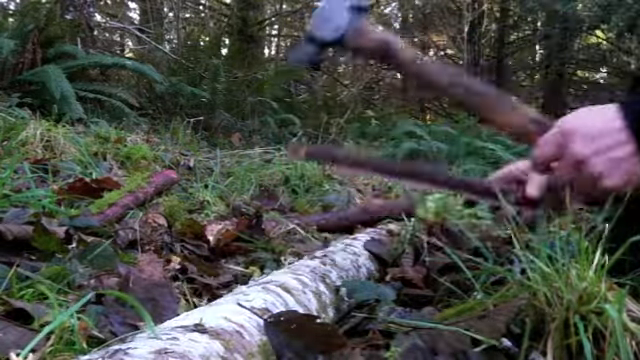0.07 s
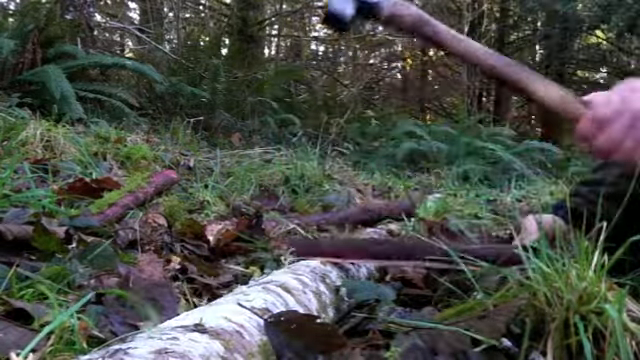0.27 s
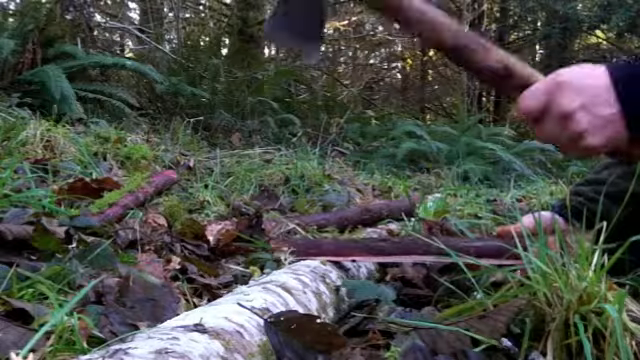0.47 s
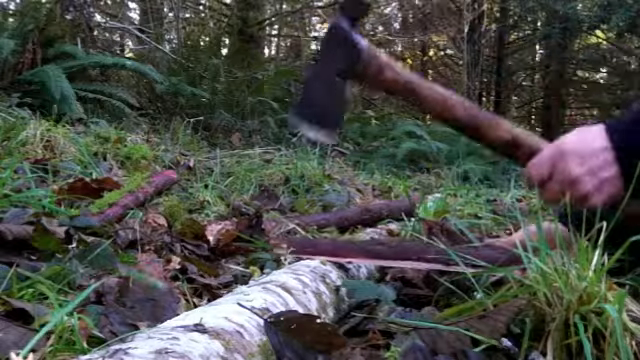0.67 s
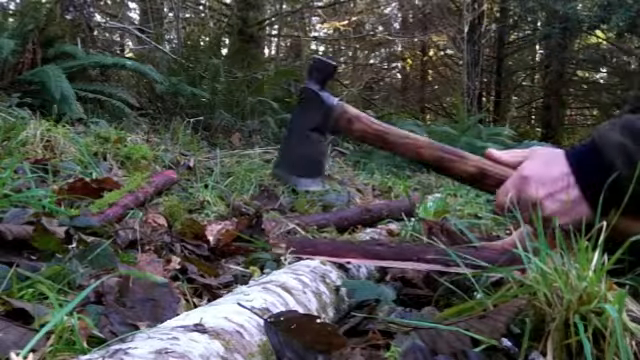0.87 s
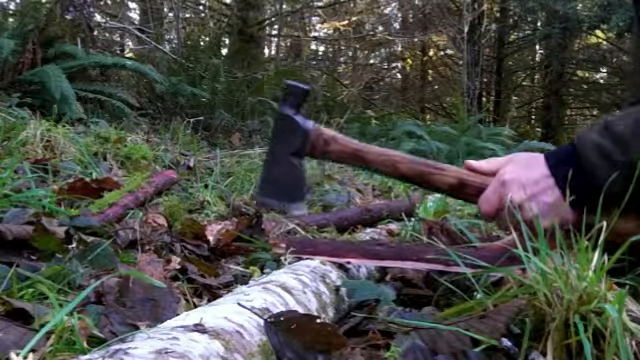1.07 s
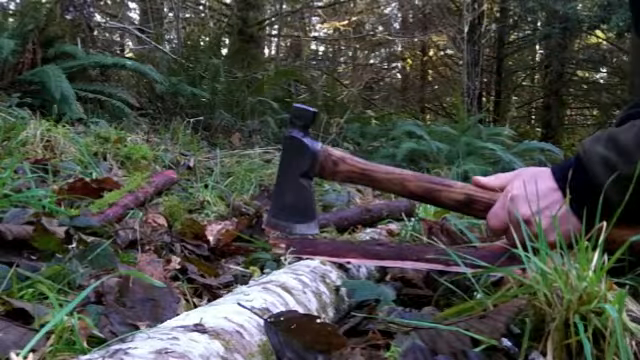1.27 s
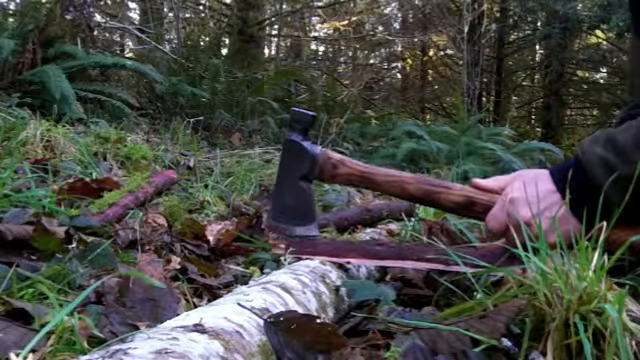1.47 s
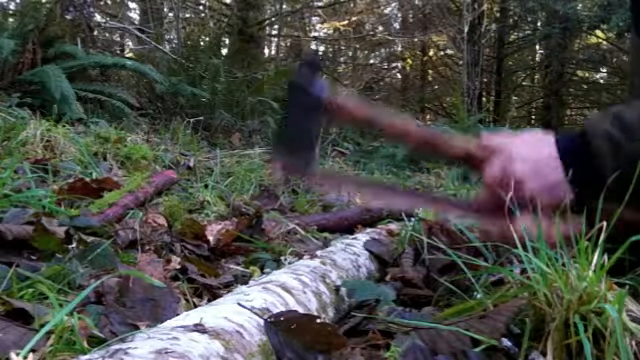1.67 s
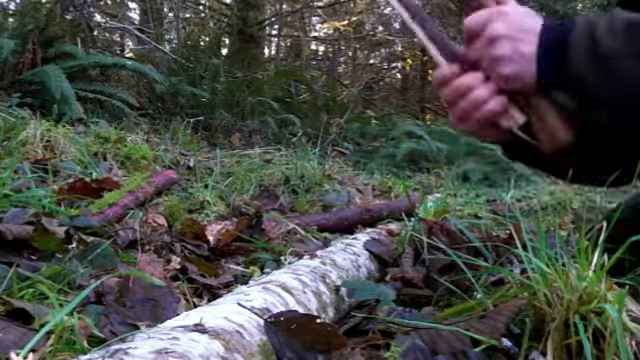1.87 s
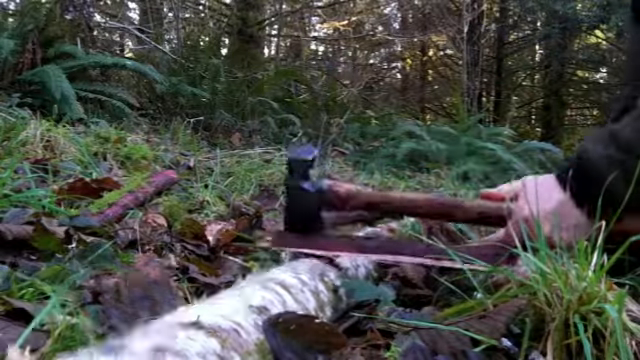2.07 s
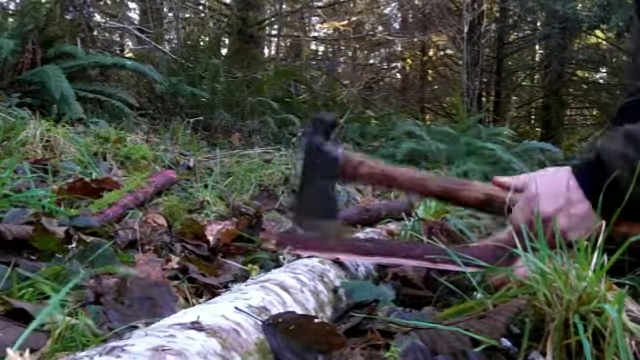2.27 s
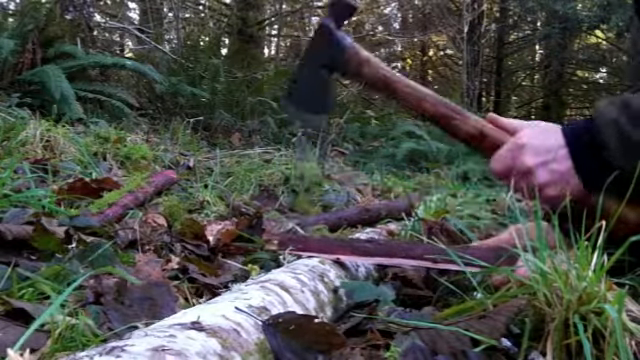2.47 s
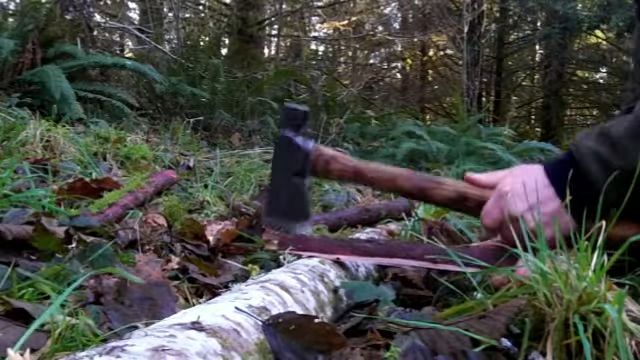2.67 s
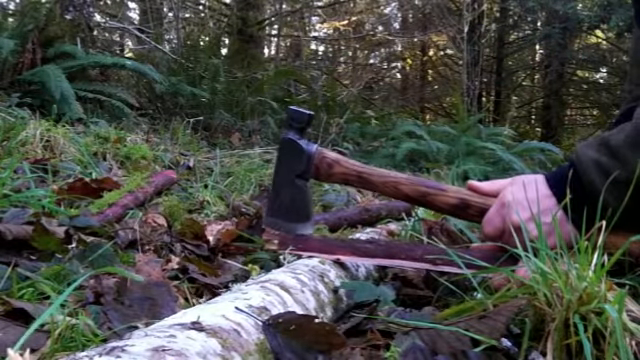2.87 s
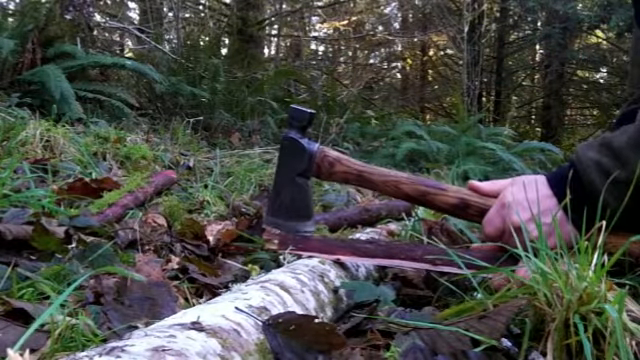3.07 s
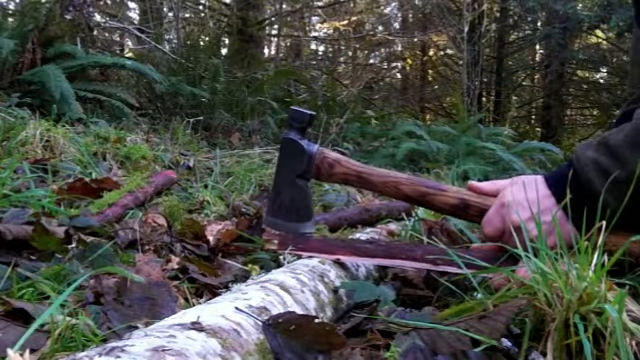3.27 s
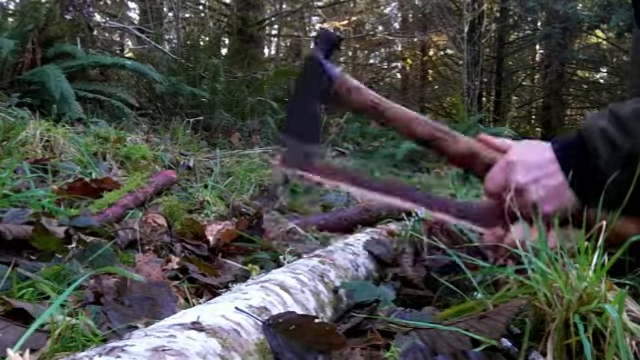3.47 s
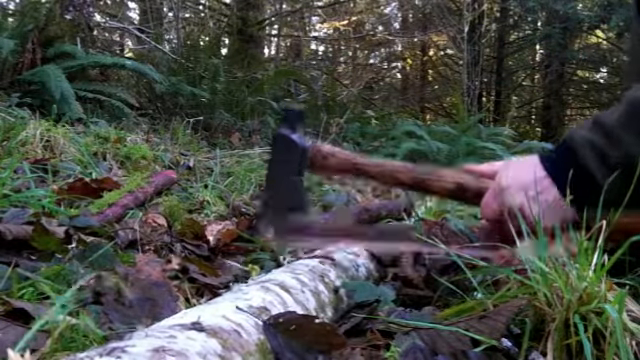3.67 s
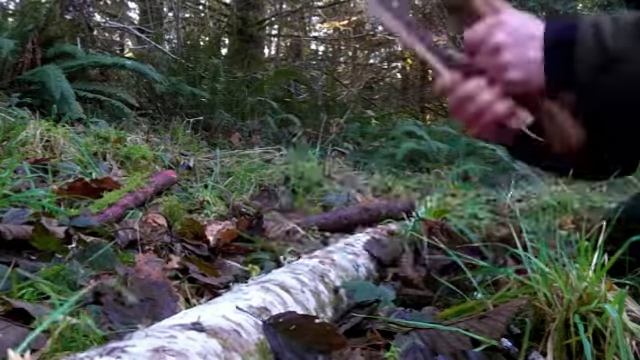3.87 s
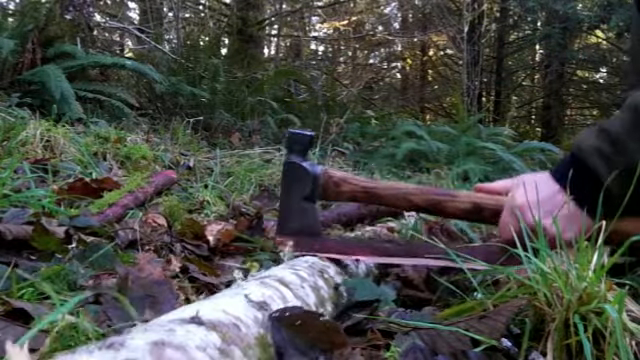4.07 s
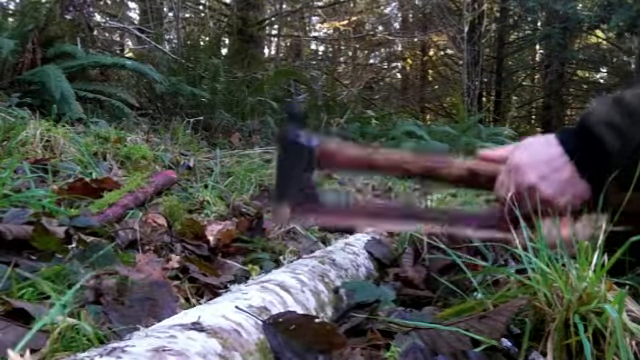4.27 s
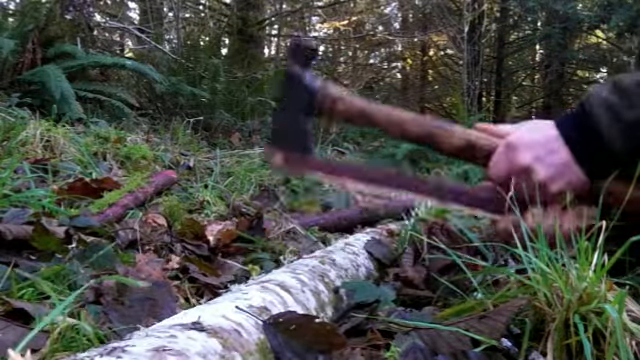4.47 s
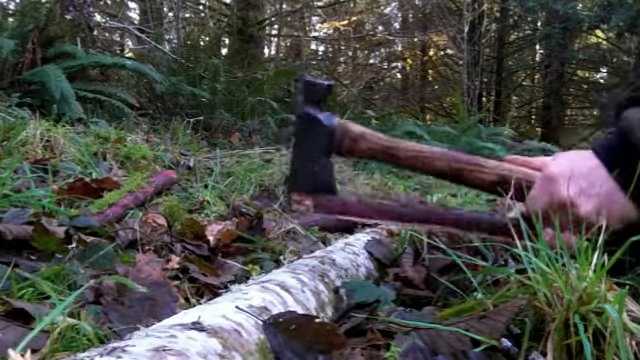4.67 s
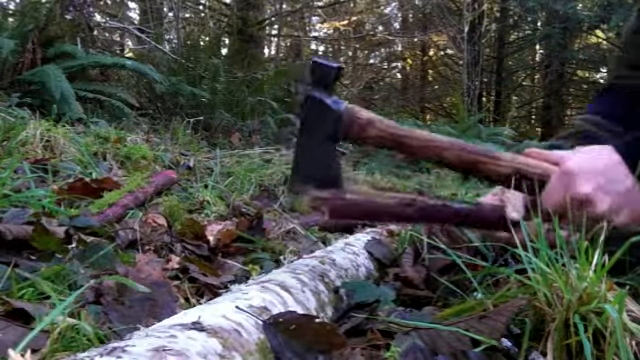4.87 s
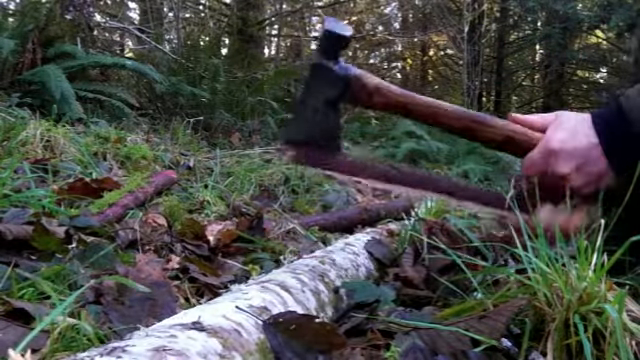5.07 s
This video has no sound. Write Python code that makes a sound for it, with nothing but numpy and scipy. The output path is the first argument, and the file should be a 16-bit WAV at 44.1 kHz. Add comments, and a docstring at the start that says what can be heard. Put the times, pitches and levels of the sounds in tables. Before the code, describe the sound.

Quiet forest air with faint leaf and sleeve rustle and light microphone hiss, close and mono, with hardly any echo. At 0.25 s a hatchet knocks a dry stick on a log: a short hollow woody clack, a small bounce just after, then tiny taps, a fibre tick and a very faint steel ring around 0.4-0.45 s. Near silence until 2.05 s, when a hard, bright crack with splinters and a low log-and-soil thud lands, the stick hopping back soon after. A soft rub and light tap follow at 2.3 s. Another strong, woody chop falls at 3.6 s, and the heaviest, splintery and slightly clipped, at 4.06 s, ducking the level briefly. A knock and fibre snaps come at 4.23 s with a dry scrape. At 4.55 s a loud sharp snap opens a run of crisp clicks and fine tearing crackle, thinning out to 5.1 s.

```python
"""A hatchet splits a dry stick on a birch log in a quiet forest, close to the microphone.
Four blows ring damped modes of stick and log under a crack and splinter noise; the stick hops after each.
Lighter knocks, filtered fibre snaps and a fine tearing crackle follow as the blade is worked and twisted.
Coloured noise makes the rubbing steel, the stirred leaves and the still air.
Loud sound pulls the recorder's gain down for a moment, and what exceeds full scale is clipped."""
import sys
import numpy as np
from scipy import signal
from scipy.fft import rfft, irfft, next_fast_len
from scipy.io import wavfile

SR = 44100
rng = np.random.default_rng(int(sys.argv[2]) if len(sys.argv) > 2 else 0)


def int16_out(signal):
    """Quantize to a 16-bit WAV file."""
    q = np.round(np.clip(np.atleast_2d(signal).T, -1, 1) * 32767)
    wavfile.write(sys.argv[1], SR, q.astype(np.int16))


N = 224950
T = np.arange(N) / SR  # scene time, s
AGE = np.arange(int(0.4 * SR)) / SR  # time since a contact, s


def amp(db):
    """Decibels to gain."""
    return 10 ** (np.asarray(db) / 20)


def unit(x):
    """x at rms 1."""
    return x / np.sqrt(np.mean(x ** 2) + 1e-20)


def level(rows):
    """Gain per sample from (s, dB) rows, near silence before the first."""
    return amp(np.interp(T, *np.transpose(rows), left=-120))


def add(track, s, sound):
    """Mix a sound in at a time in seconds."""
    part = track[round(s * SR):][:len(sound)]
    part += sound[:len(part)]


def colour(x, points):
    """Causal minimum-phase filter through (Hz, dB) points that keeps the power of white noise."""
    m = next_fast_len(2 * len(x), True)
    hz, db = np.transpose(points)
    log_hz = np.log(np.fft.rfftfreq(m, 1 / SR) + 1)
    gain = unit(amp(np.interp(log_hz, np.log(hz), db)))
    # folding the cepstrum onto positive times makes the filter causal
    cepstrum = irfft(np.log(gain), m)
    cepstrum[1:m // 2] *= 2
    cepstrum[m // 2 + 1:] = 0
    response = np.exp(rfft(cepstrum))
    return irfft(rfft(x, m) * response, m)[:len(x)]


def noise(points):
    """Steady coloured noise of rms 1."""
    return unit(colour(rng.standard_normal(N), points))


def fade(t60):
    """Exponential decay by 60 dB in t60 seconds."""
    return 1000 ** (-AGE / t60)


def swell(rise):
    """The contact builds up with a short time constant in seconds."""
    return 1 - np.exp(-AGE / rise)


def stroke(s, hold, rise, fall):
    """Envelope that grows up to time s, holds, then dies away; all in seconds."""
    growth = np.minimum(T - s, 0) / rise
    decay = np.maximum(T - s - hold, 0) / fall
    return np.exp(growth - decay)


def ring(modes, length, rise):
    """Damped modes of alternating polarity, struck at slightly new strengths each time."""
    sizes = amp(rng.standard_normal(len(modes))) * (-1) ** np.arange(len(modes))
    tones = 0
    for (hz, db, t60), size in zip(modes, sizes):
        tones = tones + size * amp(db) * fade(t60 * length) * np.sin(2 * np.pi * hz * AGE)
    return tones * swell(rise)


def burst(t60, tail_db, tail_t60):
    """Noise of a fracture, with a weaker, longer tail scattered by the ground nearby."""
    return rng.standard_normal(len(AGE)) * (fade(t60) + amp(tail_db) * fade(tail_t60))


# Full blows of the hatchet, close to the microphone. Each row: start in seconds, force in dB (also the
# crack level), crack pitch in Hz, stick level in dB, log level in dB, share of the stick's and log's full
# ring time, delay of the log in seconds.
BLOWS = [(0.2499, -2.5, 776, -5, -25, 0.79, 0.0027), (2.0451, 10, 1555, 1, 1, 0.7, 0.0037),
         (3.5965, 6.5, 1001, -5, -5.5, 0.97, .006), (4.0636, 14, 1300, -0.5, 3, 0.46, .008)]
SPLINTER_DB, SPLINTER_GROWS = -23, 1.386  # level at force 0 dB, dB per dB of force
HOP_S, HOP_GROWS = 0.0775, 0.372  # flight in seconds at force 0 dB, its growth in dB per dB of force
LAND_CRACK_DB, LAND_HZ, LAND_STICK_DB, LAND_SPLINTER_DB = -37, 740, -33, -48
LAND_LOG_DB, LAND_LOG_GROWS = -35, 0.6  # level at force 0 dB, dB per dB of force


def chops():
    """Each blow pins the stick on the log; it hops once and lands, later and heavier after a harder blow."""
    track = np.zeros(N)
    for s, force_db, hz, stick_db, log_db, length, log_delay in BLOWS:
        splinter_db = SPLINTER_DB + SPLINTER_GROWS * force_db
        blow = contact(force_db, hz, stick_db, log_db, splinter_db, length, log_delay)
        add(track, s, blow)
        weight_db = LAND_LOG_DB + LAND_LOG_GROWS * force_db
        landing = contact(LAND_CRACK_DB, LAND_HZ, LAND_STICK_DB, weight_db, LAND_SPLINTER_DB, length=1)
        flight = HOP_S * amp(HOP_GROWS * force_db)
        add(track, s + flight, landing)
    return track


# The bite of the blade. Each row: multiple of the crack pitch, level in dB.
CRACK = [(1.45, -9), (1, -3), (.7, -3.5), (.46, -10)]
# Flying splinters of dry wood. Each row: frequency in Hz, relative density in dB per Hz.
SPLINTER = [(100, -14), (600, 8.5), (1500, 16), (3300, 11.5), (5000, 4), (6500, -11.5), (8000, -37.5),
            (15000, -23.5)]
# Modes of the dry stick. Each row: frequency in Hz, level in dB, t60 in seconds at full ring.
STICK = [(453.4, -1.5, 0.11), (650.6, -11, 0.1), (705.6, -7, 0.052), (928, -20.5, 0.075),
         (1000, -16.5, 0.027), (1665, -20.5, 0.054), (2115, -18, 0.028), (3052, -22, 0.063),
         (4350, -29.5, .035), (4790, -33.5, 0.027)]
# Modes of the birch log under it. Each row: frequency in Hz, level in dB, t60 in seconds at full ring.
LOG = [(67, -12.5, 0.1), (103, -10.5, .13), (237, -8, 0.13), (297, -5.5, 0.13), (401.7, 0.5, 0.083)]
# The thud of the soil under the log. Each row: frequency in Hz, relative density in dB per Hz.
SOIL = [(25, -1), (70, -7), (160, 1.5), (300, 0.5), (600, -5), (1000, -16.5), (2500, -49)]


def contact(crack_db, hz, stick_db, log_db, splinter_db, length, log_delay=0):
    """A crack with splinters; the stick rings and, after any delay, drives the log into the soil."""
    # the crack dies by 60 dB in 8.52 cycles of its pitch
    bite = [(hz * ratio, db, 8.52 / hz) for ratio, db in CRACK]
    crack = amp(crack_db) * ring(bite, 1, rise=0.00015)
    shower = swell(0.0014) * burst(t60=0.024, tail_db=-4.0, tail_t60=0.072)
    splinters = amp(splinter_db) * colour(shower, SPLINTER)
    stick = amp(stick_db) * ring(STICK, length, rise=0.0039)
    sound = crack + splinters + stick
    thud = swell(0.00031) * burst(t60=0.045 * length, tail_db=-13.0, tail_t60=0.24 * length)
    soil = amp(-5.5) * colour(thud, SOIL)
    log = ring(LOG, length, rise=0.0051)
    add(sound, log_delay, amp(log_db) * (log + soil))
    return sound


# Light knocks of the blade against the stick. Each row: start in seconds, crack level in dB, crack pitch
# in Hz, stick level in dB, share of the full ring time.
TAPS = [(0.4060, -31.5, 1560, -50, 0.28), (0.435, -59, 880, -34, 0.21), (2.331, -23, 2830, -25.5, 0.71),
        (4.2282, -7, 2300, -22, 0.18), (4.5597, -17.5, 1110, -32, 0.14)]
TAP_LOG_DB, TAP_SPLINTER_DB = -6, -19  # relative to the stick, relative to the crack


def taps():
    """The blade knocks the stick as it is worked loose or twisted."""
    track = np.zeros(N)
    for s, crack_db, hz, stick_db, length in TAPS:
        log_db = stick_db + TAP_LOG_DB
        splinter_db = crack_db + TAP_SPLINTER_DB
        add(track, s, contact(crack_db, hz, stick_db, log_db, splinter_db, length))
    return track


# Thick bundles of fibres breaking. Each row: start in seconds, level in dB before a common 3 dB cut,
# centre in Hz.
SNAPS = [(0.4532, -28, 3130), (4.2280, -8.5, 4750), (4.2589, -17, 3870), (4.263, -20, 3360),
         (4.5583, 3, 4480), (4.578, -12.5, 4400), (4.5895, -7.5, 4300), (4.6073, -16.5, 4800),
         (4.6419, -23, 4050), (4.662, -12.5, 4750), (4.6634, -15, 2800), (4.7374, -10.5, 4650),
         (4.7735, -25.5, 4420), (4.8303, -21, 4330), (4.8558, -15, 4500), (4.8686, -16, 4430),
         (4.885, -22.5, 4700), (5.08, -25, 2540)]
# Breaking fibres, thick and fine. Each row: frequency in Hz, relative density in dB per Hz.
FIBRE = [(100, -7), (800, -8), (1500, -1), (2100, 6), (2900, 1.5), (3600, -3.5), (4300, -2.5), (5300, 0),
         (6500, -10), (8000, -19.5), (10000, -13.5), (16000, -22.5)]


def snaps(sharpness=5.05, click=6.0, broad_db=-21):
    """Each bundle of fibres lets go with a click and a burst, pitched by its thickness."""
    track = np.zeros(N)
    for s, db, hz in SNAPS:
        fracture = burst(t60=0.009, tail_db=-24, tail_t60=0.035)
        fracture[0] = click
        pitched = signal.lfilter(*signal.iirpeak(hz, sharpness, SR), fracture)
        bundle = pitched + amp(broad_db) * fracture
        add(track, s, amp(db - 3) * colour(bundle, FIBRE))
    return track


def blade():
    """The steel sings faintly, one damped mode, as it pulls free after the first blow."""
    track = np.zeros(N)
    add(track, 0.452, ring([(3570, -51, 0.2)], 1, rise=0.001))  # Hz, dB, t60 in seconds
    return track


# Each twist of the blade runs the split further along the grain. Each row: time of full strain in seconds,
# length in seconds, level in dB at that time.
TEARS = [(4.552, 0.1, -35), (4.739, 0.15, -45), (4.84, 0.028, -36.5), (4.919, .055, -55.5),
         (5.086, .02, -52)]
TEAR_ATTACK_S, TEAR_SAG_DB_PER_S, TEAR_RELEASE_S = 0.0091, 78, 0.013


def tearing(per_second=900, spread_db=2.5):
    """Fine fibres part in a dense crackle that weakens as each twist spends its strain."""
    excess_db = spread_db * np.minimum(rng.exponential(size=N), 3)
    sizes = amp(excess_db) * rng.choice([-1, 1], N)
    ticks = sizes * (rng.random(N) < per_second / SR)
    fine = signal.lfilter(*signal.iirpeak(4550, 2.2, SR), colour(ticks, FIBRE))
    strain = np.zeros(N)
    for s, length, db in TEARS:
        sag_db = TEAR_SAG_DB_PER_S * np.clip(T - s, 0, length)
        strain += amp(db - sag_db) * stroke(s, length, TEAR_ATTACK_S, TEAR_RELEASE_S)
    return strain * unit(fine)


# The wedged blade rubs in the cut as it is eased. Each row: loudest time in seconds, level in dB.
RUBS = [(2.278, -48.5), (4.285, -44)]
RUB_RISE_S, RUB_FALL_S = 0.052, 0.042
# Dry hiss, for the rubbing and the leaf litter. Each row: frequency in Hz, relative density in dB per Hz.
LEAVES = [(100, -8.5), (400, 0.5), (1400, 0), (3200, 1), (5000, -12), (7000, -31), (12000, -40.5)]


def rubbing():
    """Steel slides on split wood with a short dry hiss."""
    pressure = sum(amp(db) * stroke(s, 0, RUB_RISE_S, RUB_FALL_S) for s, db in RUBS)
    return pressure * noise(LEAVES)


# Leaf litter and sleeve stirring. Each row: time in seconds, level in dB before a common 3.5 dB cut.
RUSTLE = [(0.0, -53), (0.34, -54.5), (0.83, -54), (1.12, -60), (1.56, -61), (2.16, -53), (3.07, -62.5),
          (3.63, -59.5), (4.0, -55.5)]
# Leaves shaken by a blow: level in dB at force 0 dB, dB per dB of force, t60 in seconds.
SHAKE_DB, SHAKE_GROWS, SHAKE_T60_S = -54.5, 2, 0.36
# Still forest air around the microphone. Each row: frequency in Hz, relative density in dB per Hz.
FOREST = [(20, 6), (70, 8), (200, 3.5), (600, -1), (1500, -3.5), (3200, -7), (4500, -5.5), (6400, -7),
          (7500, -16), (8200, -38)]


def forest():
    """Still air among the trees, and leaf litter stirred by the arm and shaken by every blow."""
    stir = amp(-3.5) * level(RUSTLE)
    for s, force_db, *_ in BLOWS:
        add(stir, s, amp(SHAKE_DB + SHAKE_GROWS * force_db) * fade(SHAKE_T60_S))
    return amp(-58.5) * noise(FOREST) + stir * noise(LEAVES)


def scene():
    """Everything reaches one microphone."""
    wood = chops() + taps() + snaps() + blade() + tearing() + rubbing()
    return (wood + forest())[None]


def smooth(v, tau):
    """One-pole average with a time constant in seconds."""
    keep = np.exp(-1 / (tau * SR))
    return signal.lfilter([1 - keep], [1, -keep], v)


def gain_control(x, threshold_db=-14.5, overshoot=1.338, window=0.00081, attack=0.0078, recovery_db=100):
    """Loud sound pulls the gain down, further than needed; it climbs back at a steady dB per second."""
    power_db = 10 * np.log10(smooth(x ** 2, window) + 1e-12)
    cut_db = overshoot * np.maximum(power_db - threshold_db, 0)
    climb_db = recovery_db * T
    held = np.maximum.accumulate(cut_db + climb_db, axis=-1) - climb_db
    return x * amp(-smooth(held, attack))


# Hiss of the microphone. Each row: frequency in Hz, relative density in dB per Hz.
HISS = [(20, -28), (7000, -15.5), (8050, -15.5), (8400, -3), (9000, 4), (11000, 4.5), (15200, 5.5),
        (15500, -24)]
TOP_HZ, FULL_SCALE = 16400, 0.93  # upper band edge, clipping level


def record(dry):
    """The recorder adds its hiss, rides the gain, clips and cuts the top."""
    ridden = gain_control(dry + amp(-65.0) * noise(HISS))
    x = np.clip(ridden, -FULL_SCALE, FULL_SCALE)
    m = next_fast_len(N + SR // 2)
    passed = np.fft.rfftfreq(m, 1 / SR) < TOP_HZ
    return irfft(rfft(x, m) * passed, m)[..., :N]


dry = scene()
out = record(dry)
int16_out(out)
```